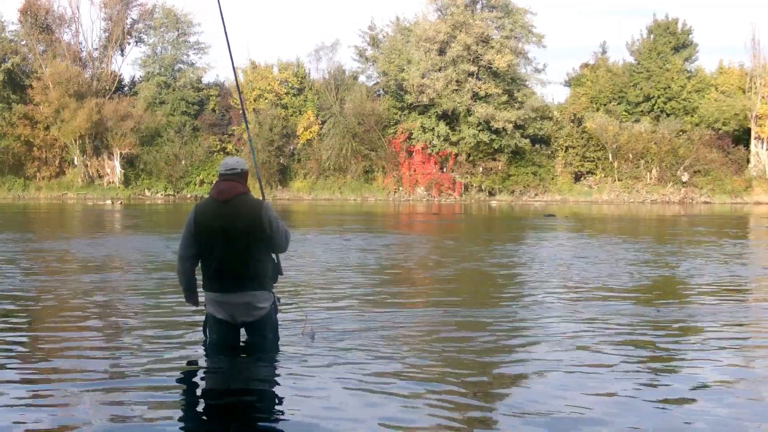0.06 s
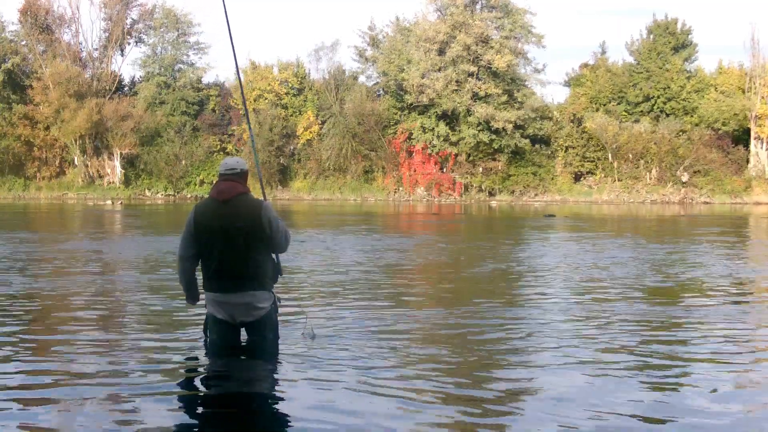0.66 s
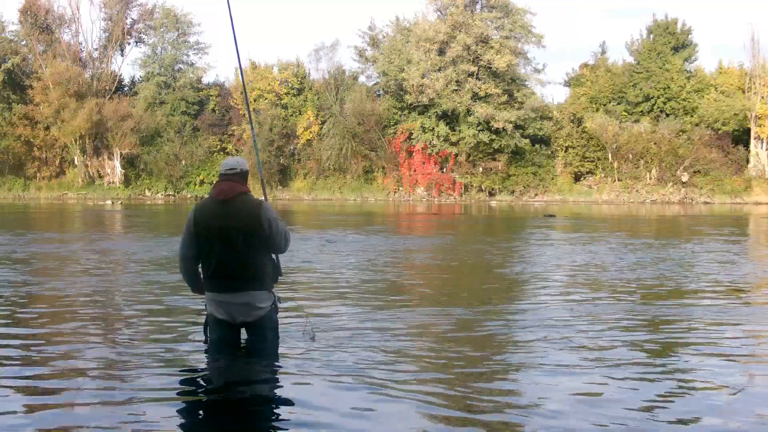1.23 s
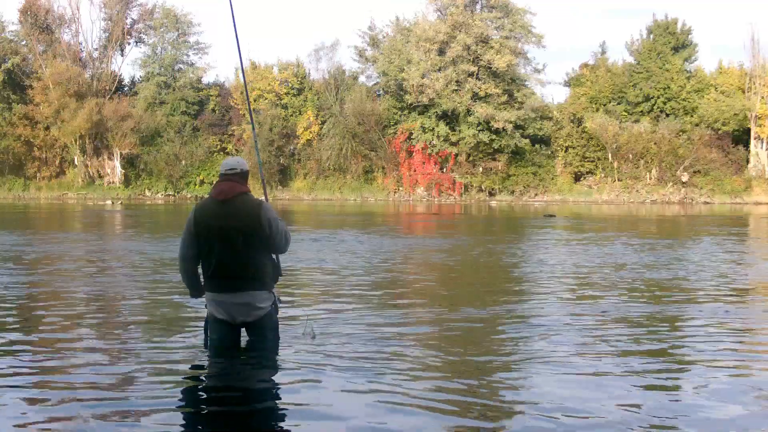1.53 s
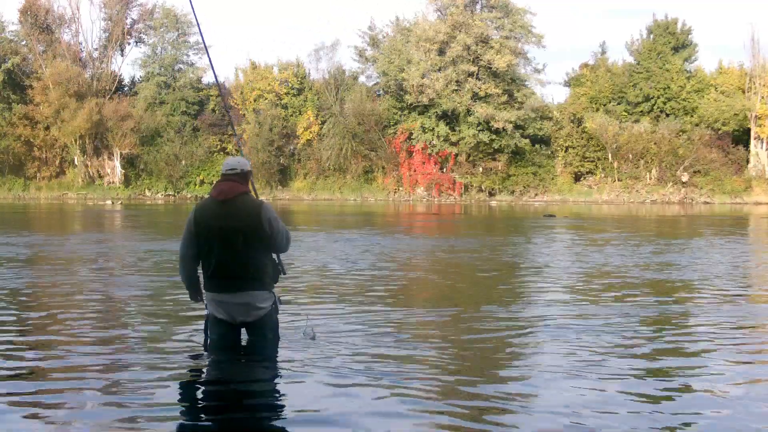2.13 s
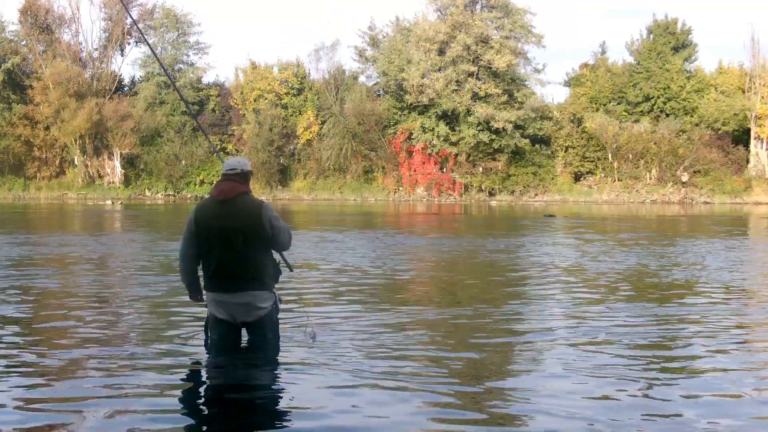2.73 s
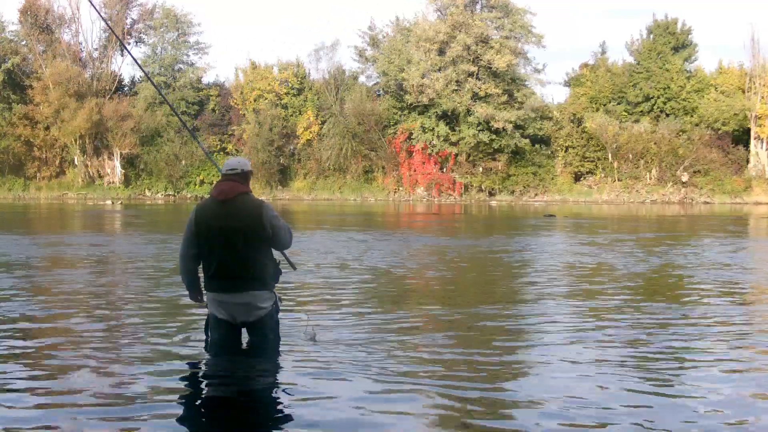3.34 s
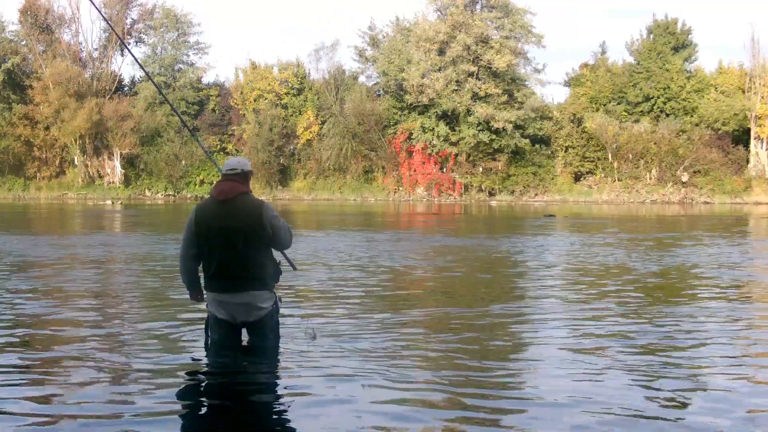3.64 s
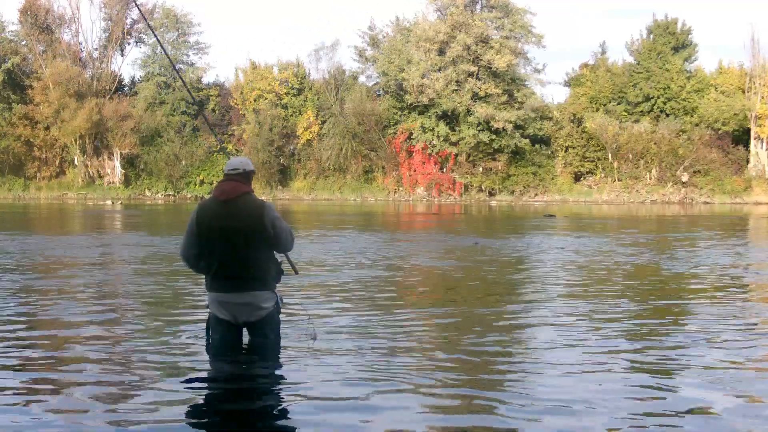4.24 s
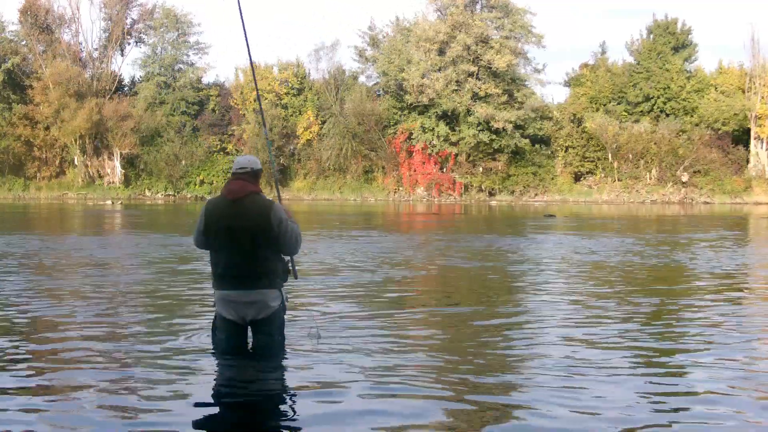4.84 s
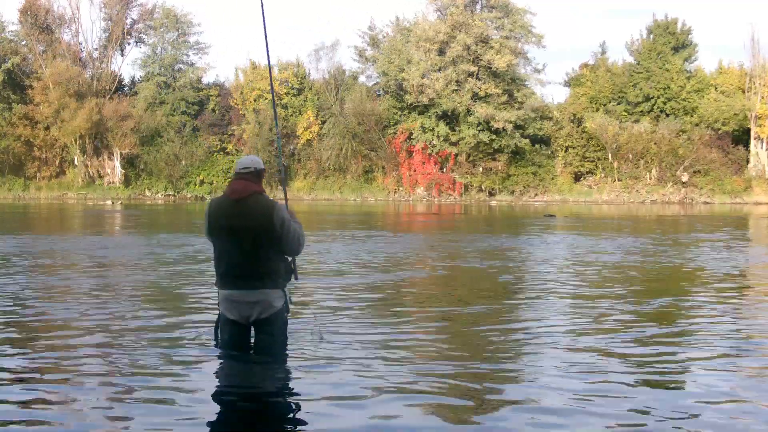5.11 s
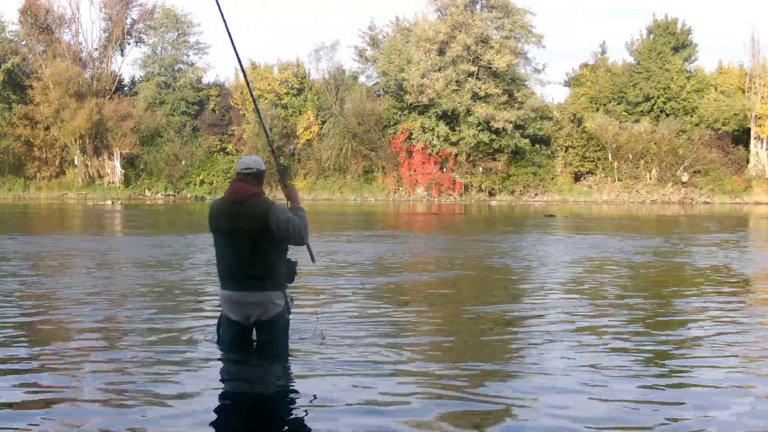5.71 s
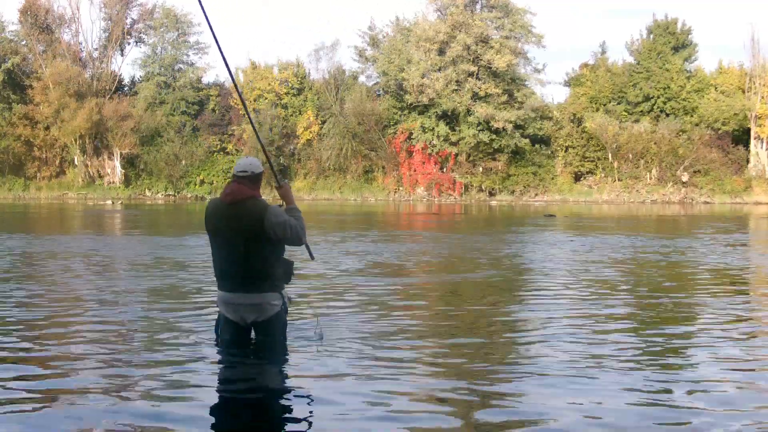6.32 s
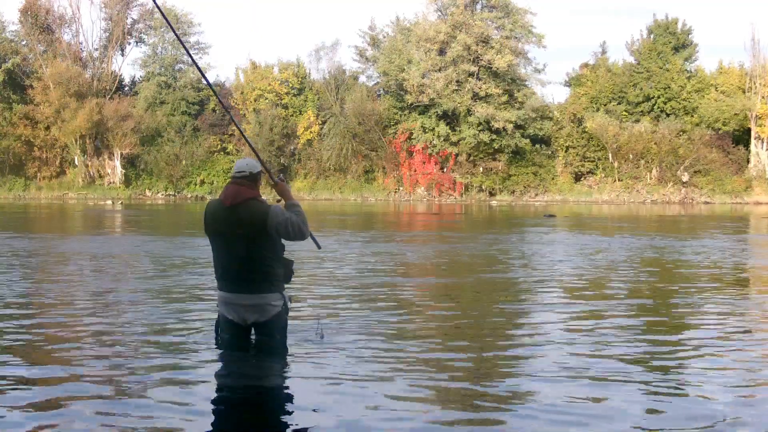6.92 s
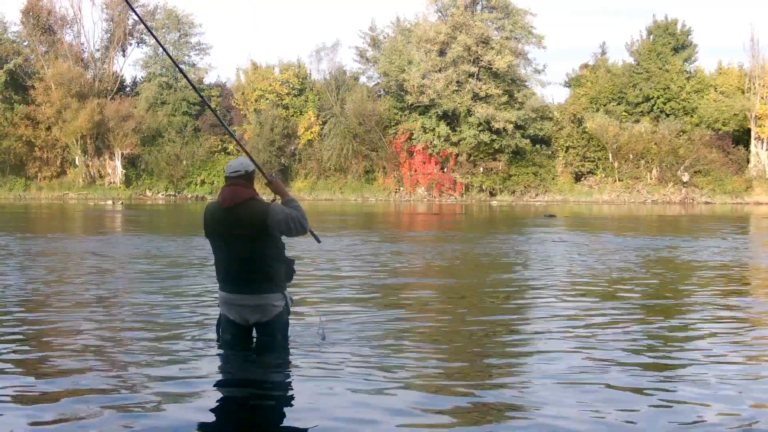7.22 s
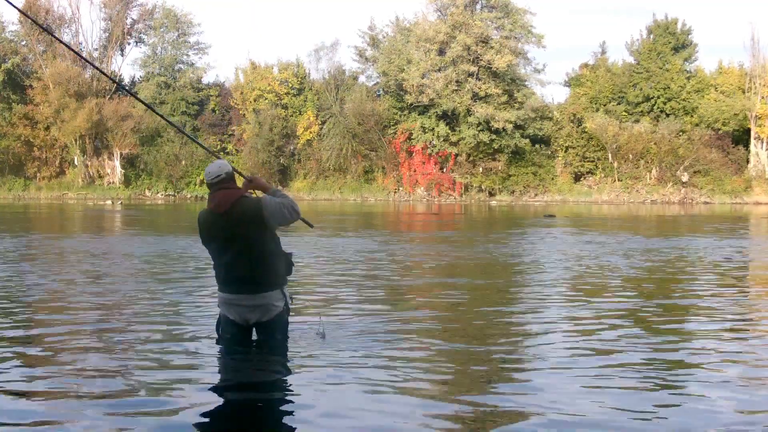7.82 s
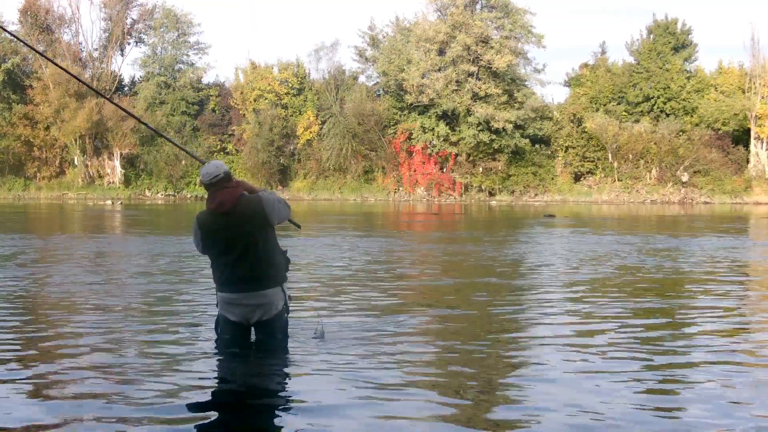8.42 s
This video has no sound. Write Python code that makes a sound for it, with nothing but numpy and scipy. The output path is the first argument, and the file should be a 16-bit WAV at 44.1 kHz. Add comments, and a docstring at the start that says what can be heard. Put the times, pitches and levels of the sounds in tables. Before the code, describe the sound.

A diesel engine idles far off, its low, uneven throb and hum swelling early and then slowly fading over the smooth wash of a wide river. From halfway on, a small bird gives a string of thin, high, falling calls that echo lightly among the trees on the bank. Wind rumbles softly on the microphone, and a camera's focus motor ticks very faintly throughout.

```python
"""Distant diesel on a wide river

A diesel engine idles far off, its uneven exhaust pulses throbbing over machine hum and the water's wash.
From halfway on a small bird gives thin, falling calls that scatter among the trees on the bank.
Air eddies rumble softly on the microphone, and a camera's lens motor ticks faintly ten times a second."""
import sys
import numpy as np
from scipy import signal
from scipy.fft import rfft, irfft
from scipy.io import wavfile
from scipy.ndimage import uniform_filter1d

SR = 44100
rng = np.random.default_rng(int(sys.argv[2]) if len(sys.argv) > 2 else 0)


def put_to_file(sound):
    """Save the sound as 16-bit audio at rate SR, in the file named by the first command-line argument."""
    columns = np.atleast_2d(sound).T  # one column per channel
    safe = np.clip(columns, -1, 1)
    whole_steps = np.round(safe * 32767)
    wavfile.write(sys.argv[1], SR, whole_steps.astype(np.int16))


N = 377496
TIME = np.arange(N) / SR


def gain_of(db):
    """Amplitude ratio of a level in decibels."""
    return 10 ** (np.asarray(db) / 20)


def unit_rms(x):
    """Normalisation to an rms of one."""
    return x / np.sqrt(np.mean(x ** 2) + 1e-20)


def at_frequency(points, hz):
    """Interpolation on a logarithmic frequency axis."""
    f, value = np.transpose(points)
    return np.interp(np.log(hz + 1), np.log(f + 1), value)


def over_time(points):
    """Linear interpolation of a curve at every sample."""
    return np.interp(TIME, *np.transpose(points))


def add(mix, start_s, sound):
    """Superposition of a sound from a given time on."""
    part = mix[max(round(start_s * SR), 0):][:len(sound)]
    part += sound[:len(part)]


def filtered(x, response):
    """Zero-phase filtering by a gain that depends on frequency."""
    return irfft(rfft(x) * response(np.fft.rfftfreq(N, 1 / SR)), N)


def noise(spectrum):
    """Gaussian noise of unit rms with the given spectral shape."""
    return unit_rms(filtered(rng.standard_normal(N), lambda f: gain_of(at_frequency(spectrum, f))))


def drift(cutoff_hz):
    """Low-pass random fluctuation of unit rms."""
    return unit_rms(filtered(rng.standard_normal(N), lambda f: np.exp(-(f / cutoff_hz) ** 2)))


# engine speed: (time [s], cycle rate [Hz])
CYCLE_RATE = [(0.0, 9.649), (0.5, 9.605), (1.2, 9.658), (2.5, 9.682), (3.5, 9.73), (4.5, 9.77),
              (5.7, 9.729), (7.3, 9.721), (8.56, 9.689)]
# gain of the engine's low mids against its bass: (time [s], gain [dB])
LOW_MID_GAIN = [(0, -5.5), (.7, -5.5), (1.6, -1.5), (3.2, -0.5), (3.9, 0.5), (4.6, -1.5), (6.6, 0),
                (7.6, -7.5), (8.56, -7)]
# gain of its upper mids against its bass: (time [s], gain [dB])
UPPER_MID_GAIN = [(0, -9), (.7, -4), (1.4, 1.5), (2.2, -0.5), (3.8, -4), (5.4, 4), (6.5, -1.5), (8, 7.5),
                  (8.56, 4)]


def engine(level_db=-33.5, peak_s=1.2, rise_db_per_s=5, fade_db_per_s=1.24, note_db=-1, roar_db=-7):
    """Propagation through moving air: the upper bands waver as the engine swells, then slowly fades."""
    cycles = np.cumsum(over_time(CYCLE_RATE)) / SR
    exhaust = gain_of(note_db) * exhaust_note(cycles) + gain_of(roar_db) * exhaust_roar(cycles)
    bass = filtered(exhaust, lambda hz: 1 / (1 + (hz / 200) ** 20))
    below_upper = filtered(exhaust, lambda hz: 1 / (1 + (hz / 320) ** 20))
    low_mids = gain_of(over_time(LOW_MID_GAIN)) * (below_upper - bass)
    upper_mids = gain_of(over_time(UPPER_MID_GAIN)) * (exhaust - below_upper)
    swell_db = np.minimum(rise_db_per_s * (TIME - peak_s), fade_db_per_s * (peak_s - TIME))
    return gain_of(level_db + swell_db) * (bass + low_mids + upper_mids) + machine_hums(cycles, swell_db)


# the four exhaust pulses of a cycle: (phase [cycles], relative strength [1])
PULSES = [(.262, .4), (.482, 1.0), (.762, .6), (.986, .9)]
# exhaust harmonics: (order [multiple of the cycle rate], relative level [dB])
HARMONICS = [(4, -24), (6, -21), (8, -4), (10, 3), (12, -8.5), (14, -0.5), (16, -4.5), (18, -2.5),
             (20, -24), (22, -10), (24, -21), (26, -12.5), (28, -16.5), (30, -17), (34, -32), (36, -19.5),
             (38, -23), (40, -18.5), (42, -23)]


def exhaust_note(cycles, dispersion_rad=.00812):
    """Fourier series: periodic pulses give a line spectrum whose phases follow from their spacing."""
    place, strength = np.transpose(PULSES)
    note = np.zeros(N)
    for order, db in HARMONICS:
        phase = np.angle(np.sum(strength * np.exp(-2j * np.pi * order * place)))
        phase -= dispersion_rad * (order - 10) ** 2  # the silencer delays high lines, softening each pulse
        waver = 1 + .12 * drift(3)
        note -= gain_of(db) * waver * np.cos(2 * np.pi * order * cycles + phase)
    return unit_rms(note)


# spectrum of the exhaust's roar: (frequency [Hz], relative density [dB])
ROAR_SPECTRUM = [(40, -27), (70, -1.5), (110, 2.5), (165, -2), (205, -3.5), (280, -9), (380, -16.5),
                 (460, -16.5), (560, -25), (800, -61.5)]


def exhaust_roar(cycles, throb_depth=.22):
    """Amplitude modulation: a rough noise puffs on each exhaust pulse."""
    puffs = sum(strength * np.exp(14 * (np.cos(2 * np.pi * (cycles - place)) - 1))
                for place, strength in PULSES)
    return unit_rms(noise(ROAR_SPECTRUM) * (1 + throb_depth * unit_rms(puffs)))


# pitches of the two machine hums: (low, high) [multiples of about 9.7 Hz]
HUM_PITCHES = (11, 32)
# loudness of the high hum: (time [s], level [dB])
HIGH_HUM_LEVEL = [(0, -70), (.6, -67), (1.6, -48.5), (3.2, -51.5), (4.2, -55.5), (6, -50), (6.7, -57.5),
                  (7.4, -59.5), (8.56, -52.5)]


def machine_hums(cycles, swell_db, low_db=-45, steepness=1.7):
    """Tonal machine noise: a low hum near 107 Hz that swells and fades, and a higher one near 310 Hz."""
    levels_db = low_db + steepness * swell_db, over_time(HIGH_HUM_LEVEL)
    hums = sum(gain_of(db) * np.sqrt(2) * np.sin(2 * np.pi * pitch * cycles)
               for pitch, db in zip(HUM_PITCHES, levels_db))
    return hums * (1 + .14 * drift(3.9))


# spectrum of the water's wash: (frequency [Hz], relative density [dB])
WASH_SPECTRUM = [(100, 0), (400, -0.5), (550, -0.5), (750, -1), (980, -3), (1250, -9.5), (1400, -10),
                 (1650, -17), (2100, -20), (3200, -27), (4500, -31.5), (7000, -37.5), (11000, -44)]


def river(level_db=-52.5, patch_db=.5):
    """Random-phase superposition: a smooth wash, with slight patches in time and frequency."""
    frames, hz = N // 256 + 5, np.fft.rfftfreq(1024, 1 / SR)
    real, imaginary, patches = rng.standard_normal((3, frames, len(hz)))
    patches = uniform_filter1d(patches, size=14, axis=0)  # along time
    patches = unit_rms(uniform_filter1d(patches, size=9, axis=1))  # along frequency
    spectra = (real + 1j * imaginary) * gain_of(at_frequency(WASH_SPECTRUM, hz) + patch_db * patches)
    wash = signal.istft(spectra.T, nperseg=1024, noverlap=768)[1][:N]
    return gain_of(level_db) * unit_rms(wash)


# spectrum of air on the microphone: (frequency [Hz], relative density [dB])
EDDY_SPECTRUM = [(4, -10), (15, -11), (28, -7), (42, 0.5), (56, -4), (72, -5), (110, -23.5), (250, -70)]
# gusts and lulls: (centre time [s], half length [s], level change [dB])
GUSTS_AND_LULLS = [(1.2, .2, -1), (3.6, 0.25, 1.5), (5.25, .25, 2), (7.34, 0.12, 5.5), (7.66, .12, -4.5),
                   (7.92, 0.062, 6.5)]


def air_rumble(level_db=-43, side_db=-34):
    """Turbulent pressure: slow eddies act almost equally on both microphone ports."""
    side = gain_of(side_db) * noise(EDDY_SPECTRUM)
    gusts_db = sum(db * np.exp(-((TIME - centre) / half) ** 2) for centre, half, db in GUSTS_AND_LULLS)
    return gain_of(level_db + gusts_db) * (noise(EDDY_SPECTRUM) + np.array([side, -side]))


# notes: (time [s], length [s], start pitch [Hz], end pitch [Hz], source level [dB], warble depth [Hz])
BIRD_NOTES = [(4.411, .045, 8000, 7430, -61.5, 70), (4.411, .052, 7250, 6720, -63.2, 35),
              (5.167, .04, 6800, 6400, -66.2, 300), (5.212, .032, 6500, 6230, -66, 130),
              (5.446, .048, 6220, 5780, -67, 140), (5.651, .046, 5920, 5730, -68.6, 80),
              (5.792, .048, 6020, 5660, -68, 80), (6.021, .052, 6000, 5790, -69.5, 75),
              (6.26, .064, 5920, 5720, -68.8, 60), (6.457, .057, 5870, 5660, -69.5, 85),
              (6.726, .064, 5830, 5680, -68.6, 55), (7.051, .06, 5990, 5600, -69.7, 140),
              (7.377, .042, 5830, 5650, -69.7, 25), (7.868, .056, 5900, 5620, -72.3, 20),
              (8.408, .074, 5740, 5310, -69.4, 60)]


def bird(warble_hz=90, glide_exponent=.836):
    """Frequency modulation: each near-pure whistle glides down with a rapid warble."""
    song, tremor = np.zeros(N), drift(220)
    for start_s, length_s, start_hz, end_hz, db, depth_hz in BIRD_NOTES:
        t = np.arange(int(length_s * SR)) / SR
        jitter = tremor[int(start_s * SR):][:len(t)]
        warble = np.sin(2 * np.pi * (warble_hz * t + rng.random())) + .6 * jitter
        hz = start_hz + (end_hz - start_hz) * (t / length_s) ** glide_exponent + depth_hz * warble
        envelope = (1 + .3 * jitter) * signal.windows.tukey(len(t), .25)
        whistle = envelope * np.sin(2 * np.pi * np.cumsum(hz) / SR)
        add(song, start_s, gain_of(db) * unit_rms(whistle))
    return song


def tree_echoes(sound, t60_s=.58, high_t60_s=.32, build_s=.015, echoes_per_s=900):
    """Scattering: trunks and leaves return many small echoes that build up and fade, the highest first."""
    t = np.arange(SR * 3 // 4) / SR
    taps = rng.standard_normal((3, len(t))) * (rng.random((3, len(t))) < echoes_per_s / SR)
    echoes = (taps[0] + .3 * taps[1:]) * (1 - np.exp(-t / build_s))  # mostly common to both channels
    hz, delay_s, spectra = signal.stft(echoes, SR, nperseg=256)
    band_t60_s = at_frequency([(6000, t60_s), (7500, high_t60_s)], hz)[:, None]
    tail = signal.istft(spectra * gain_of(-60 * delay_s / band_t60_s), SR, nperseg=256)[1]
    return signal.fftconvolve(sound[None], tail / np.linalg.norm(tail[0]), axes=1)[:, :N]


# strokes in each step of a long and of a short focus search
LONG, SHORT = (2, 2, 1, 1, 2, 1, 2, 1, 1, 2, 2), (2, 2, 2)
# focus searches: (start time [s], strokes in each step [count])
FOCUS_SEARCHES = [(-.743, LONG), (.459, SHORT), (.861, LONG), (2.061, LONG), (3.264, LONG), (4.465, LONG),
                  (5.666, SHORT), (6.066, LONG), (7.267, LONG), (8.469, LONG)]
# partials of the motor's whine: (frequency [Hz], width [Hz], relative level [dB])
WHINE_PARTIALS = [(1400, 110, 3.5), (2800, 100, 0), (4205, 100, -6)]


def lens_motor(level_db=-65.3, rasp_db=-4, step_s=.1001, stroke_s=.0185):
    """Gated vibration: a tiny motor hunts for focus, each step a burst of gritty whine and rasp."""
    gate = np.zeros(N)
    for start_s, search in FOCUS_SEARCHES:
        for step, strokes in enumerate(search):
            onset_s = start_s + step * step_s
            if onset_s >= 0:
                t = np.arange(int(strokes * stroke_s * SR)) / SR
                arches = abs(np.sin(np.pi * t / stroke_s)) ** .3
                add(gate, onset_s, signal.windows.tukey(len(t), .1) * arches)
    whine = sum(gain_of(db) * np.sin(2 * np.pi * np.cumsum(hz + width / 2 * drift(300)) / SR)
                for hz, width, db in WHINE_PARTIALS)
    grit = 1 + .55 * np.sin(2 * np.pi * np.cumsum(150 + 35 * drift(40)) / SR)
    rasp = noise([(600, -32), (1500, 5.5), (3000, -2), (4800, -11), (8000, -18), (14000, -34)])
    return gain_of(level_db) * gate * (unit_rms(whine * grit) + gain_of(rasp_db) * rasp)


# spectrum of the microphones' hiss: (frequency [Hz], relative density [dB])
HISS_SPECTRUM = [(100, 1), (700, -12), (1500, -2.5), (3000, 10), (6000, 8.5), (10000, 8), (16000, 6)]


def microphone_hiss(level_db=-70, whistle_db=-94, whistle_hz=7855):
    """Self-noise: each microphone hisses independently; the camera adds a very thin steady whistle, common to
    both."""
    whistle = np.sqrt(2) * np.sin(2 * np.pi * np.cumsum(whistle_hz + 20 * drift(18)) / SR)
    hiss = np.array([noise(HISS_SPECTRUM), noise(HISS_SPECTRUM)])
    return gain_of(level_db) * hiss + gain_of(whistle_db) * whistle


def scene(direct_db=-2.3, echo_db=-2.8):
    """Superposition: sources straight ahead reach a closely spaced pair of microphones in phase."""
    song = bird()
    mix = river() + engine() + air_rumble() + microphone_hiss() + lens_motor()
    return mix + gain_of(direct_db) * song + gain_of(echo_db) * tree_echoes(song)


def record(dry):
    """Band limiting: a linear-phase low-pass filter removes the highest treble."""
    low_pass = signal.firwin(767, cutoff=15750, window=("kaiser", 9), fs=SR)
    return signal.oaconvolve(dry, low_pass[None], "same")


dry = scene()
out = record(dry)
put_to_file(out)
```